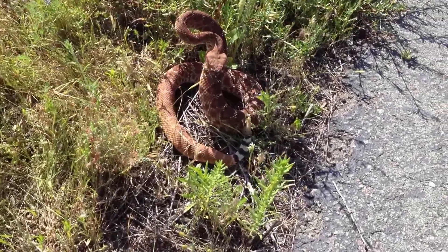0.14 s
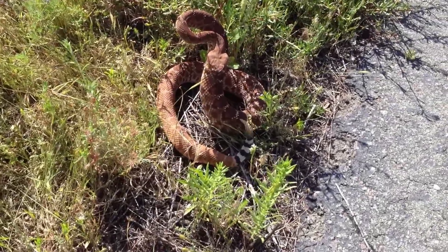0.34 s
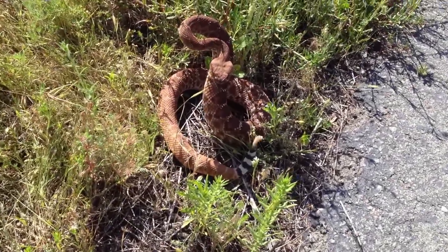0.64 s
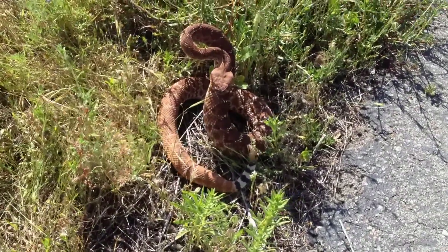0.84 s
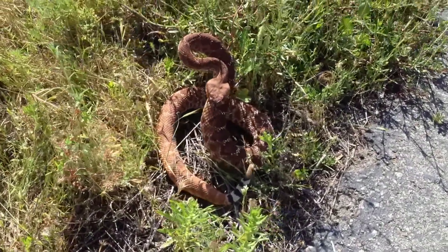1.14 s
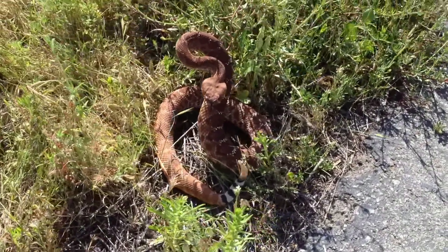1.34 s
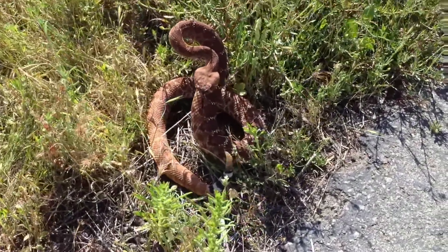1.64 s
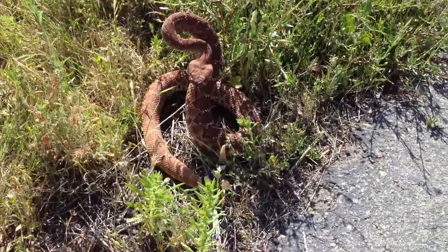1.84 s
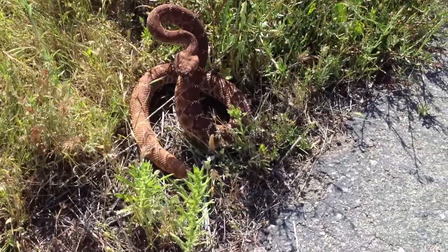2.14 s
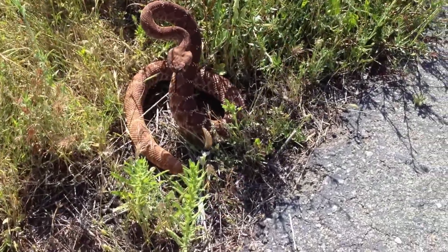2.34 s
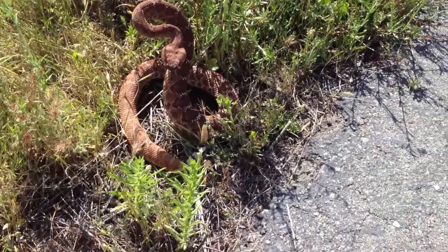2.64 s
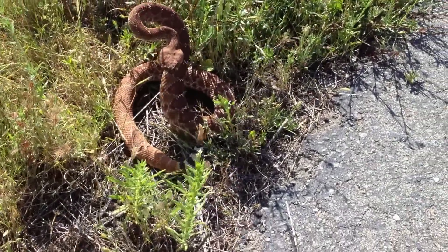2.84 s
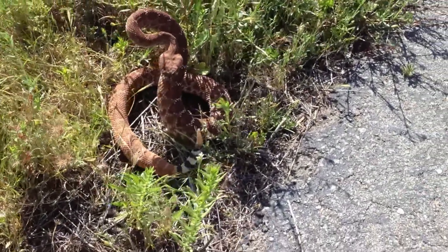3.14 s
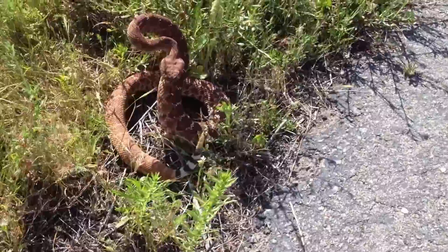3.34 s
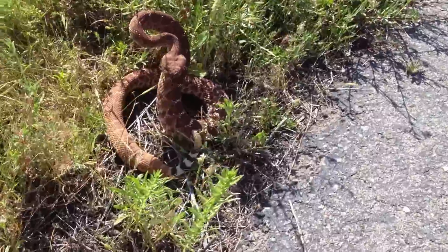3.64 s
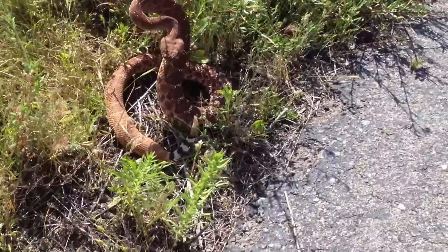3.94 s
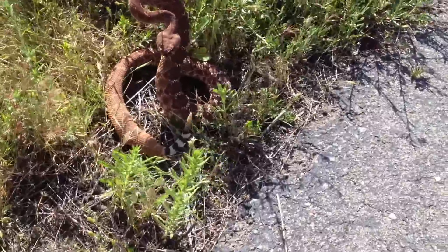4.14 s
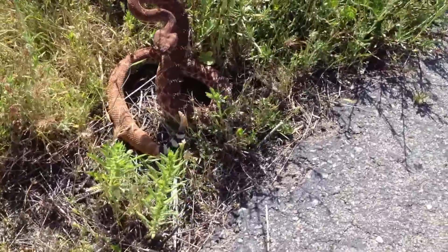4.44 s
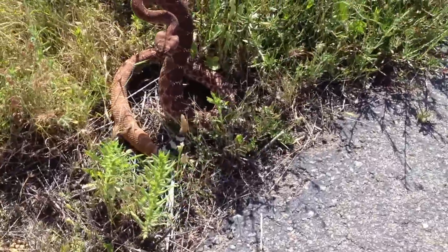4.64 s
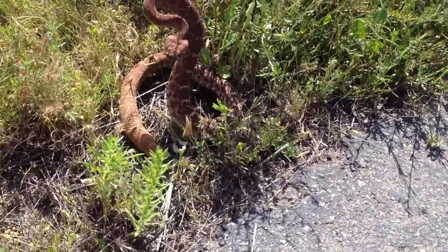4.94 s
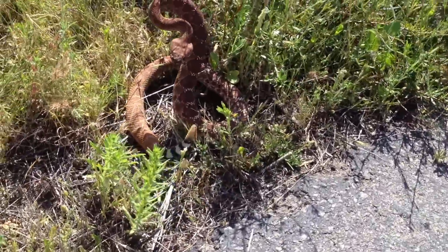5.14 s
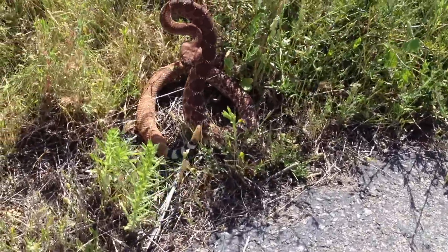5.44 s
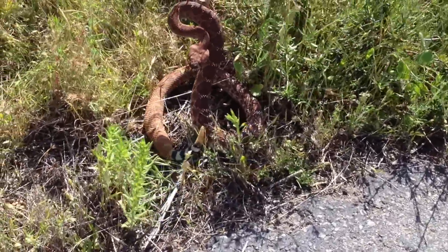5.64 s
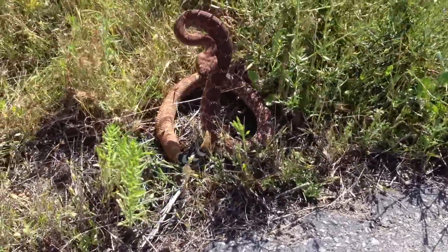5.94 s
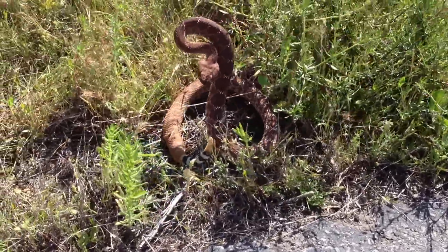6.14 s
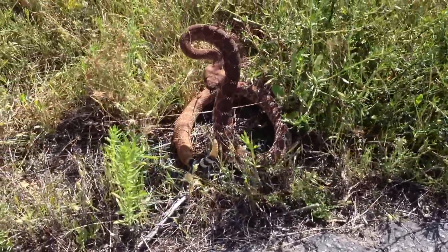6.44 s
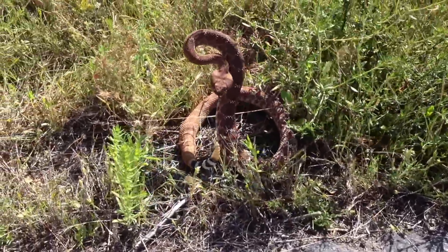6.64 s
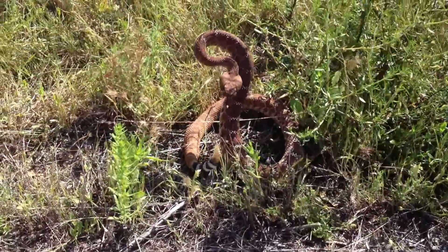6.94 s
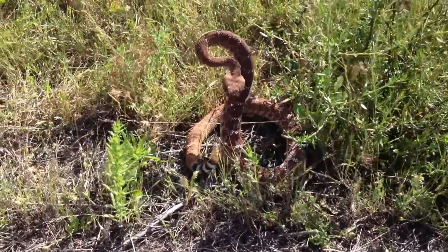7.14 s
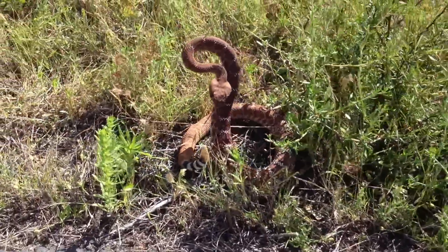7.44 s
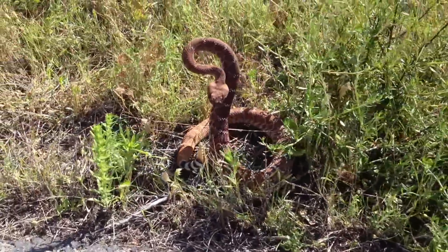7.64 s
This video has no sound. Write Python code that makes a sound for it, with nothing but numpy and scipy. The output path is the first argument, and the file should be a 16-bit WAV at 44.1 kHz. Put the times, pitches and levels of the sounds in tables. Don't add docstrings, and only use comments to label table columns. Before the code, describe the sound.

Outdoors at a grassy roadside, a dry, bright rattle starts as quiet uneven ticks, firms into rapid steady shaking, dips slightly, swells again, and finally fuses into a dense high buzz that slows a little. Low muffled wind puffs bump the close microphone, and occasional sharp snaps and short scrapes come from shifting feet. A thin airy background has a barely audible far whine.

```python
import sys
import numpy as np
from scipy import signal
from scipy.fft import rfft, irfft, next_fast_len
from scipy.io import wavfile
from scipy.ndimage import uniform_filter1d, minimum_filter1d

SR = 44100
rng = np.random.default_rng(int(sys.argv[2]) if len(sys.argv) > 2 else 0)


def master(y):
    cut = np.clip(np.atleast_2d(y).T, -1, 1)
    pcm = np.round(cut * 32767)
    wavfile.write(sys.argv[1], SR, pcm.astype(np.int16))


def how_loud(loudness_db):
    steps = np.asarray(loudness_db, float) / 20
    return 10 ** steps


N = 344421

# t/s, peak level/dB, time to peak/ms, burst length/ms, drop to loose rattle/dB
TWITCHES = [(0.034, -33, 11, 20, -5.5), (0.085, -41, 3.0, 5.3, -24), (0.138, -32.5, 8.2, 13, -6),
            (0.182, -41, 3.0, 4.0, -15), (0.237, -35.5, 20, 21.3, -14), (0.31, -39, 9.9, 15, -6),
            (0.371, -30.5, 8.7, 13.4, -11), (0.425, -32, 4.7, 34, -9), (0.483, -35.5, 6.4, 5.2, -13.5),
            (0.529, -33, 16, 15, -7.5), (0.587, -31.5, 2.6, 26, -10.5), (0.649, -31.5, 7, 8.4, -11.5),
            (0.698, -40, 9.5, 47, -12), (0.768, -34, 9.5, 11, -11), (0.822, -34.5, 13.0, 27, -14),
            (0.862, -47.4, 3.0, 3.4, -4.5), (0.912, -33.5, 4.5, 23, -9.5), (0.965, -31, 9.8, 27, -11),
            (1.019, -31, 14, 23, -11.5), (1.075, -29.5, 5.1, 23.0, -9), (1.118, -30, 9.7, 21, -7),
            (1.166, -28.5, 12, 15, -8), (1.214, -31.4, 7.1, 38, -15), (1.267, -30, 6.8, 25, -11)]
# t/s, peak level/dB, drop to loose rattle/dB
SHAKING = [(1.313, -31.5, -5.5), (1.452, -28, -7), (1.582, -25.5, -5), (1.67, -25.5, -7.5), (1.76, -26, -3),
           (2.063, -25.5, -6), (2.359, -28, -7), (2.447, -28, -16), (2.492, -28, -11.5), (2.623, -31, -9),
           (2.911, -32, -11.5), (3.06, -33, -8), (3.202, -32, -9.5), (3.298, -30.5, -13), (3.513, -29, -8),
           (3.634, -28.5, -5), (3.897, -29.5, -8), (4.063, -28.5, -7.5), (4.153, -30.5, -12.5),
           (4.197, -28, -10), (4.246, -29, -5.5), (4.455, -26.5, -6.5), (4.802, -26.5, -4),
           (5.03, -26.5, -6.5), (5.283, -27, -2), (5.42, -27, -6), (5.503, -25.5, -3), (5.776, -26.5, -2.5),
           (5.945, -26, -0.5)]
# t/s, peak level/dB, time to peak/ms, burst length/ms, drop/dB
FLICK_SPREAD = (0.0015, 0.27, 1.6, 3.3, 1.35)
# t/s, level/dB, throws per second/Hz, throb depth/0-1
BUZZ = [
    (5.96, -57, 210, .2),
    (5.99, -30, 173, 0),
    (6.1, -27.5, 210, 0.06),
    (6.35, -27, 165, 0.4),
    (6.6, -26, 164, 0.58),
    (6.85, -25.5, 168, 0.5),
    (7.3, -26.5, 150, 0.45),
    (7.55, -26, 144, 0.6),
    (7.81, -26.5, 130, 0.45),
]
# f/Hz, density/dB per Hz
FLICK_SHELL = [(1290, -37), (2200, -23), (2660, -16), (3690, -9), (4330, -10), (4730, -2.5), (5120, -5.5),
               (6160, -0.5), (6990, -0.5), (7630, 0), (10700, -4.5), (13700, -3), (14800, -4.5)]
# f/Hz, density/dB per Hz
BUZZ_SHELL = [(1000, -33), (1700, -26.5), (3570, -9.5), (4090, -10.5), (5130, -4.5), (5720, -1), (6380, 0),
              (8140, -1.5), (10100, -4.5), (14800, -4.5)]
# t/s, f/Hz, level/dB
SHELL_RING = [
    (0, 4970, 3.5),
    (1.2, 5070, 4.5),
    (1.6, 7300, 3),
    (2.4, 7700, 2),
    (3.8, 6760, -0.8),
    (4.6, 8100, 4),
    (5.5, 7800, 2),
    (6.2, 8200, 3.5),
    (6.75, 7900, 2),
    (7.81, 7300, 1.5),
]
# f/Hz, width/Hz, level/dB, start t/s
LOW_RING = (6250, 430, 2, 4)
# f/Hz, width/Hz, level/dB
HOLLOW = (7100, 560, -0.72)
# t/s, level/dB
WIND = [(0, -51.5), (.85, -52), (1.4, -49), (1.7, -52.5), (2, -47), (2.35, -52.5), (2.5, -44), (2.9, -45),
        (3.15, -51), (3.4, -41.5), (3.85, -51.5), (4.05, -49.5), (4.4, -55), (5.05, -45), (5.35, -51),
        (5.9, -43.5), (6.4, -49), (6.75, -54)]
# f/Hz, density/dB per Hz
WIND_COLOUR = [(18, -66), (30, -39), (101, -2), (177, 0.5), (259, -9), (292, -11), (426, -17), (550, -21),
               (720, -34.5), (1210, -120)]
# t/s, peak level/dB, f/Hz
BUFFETS = [(1.44, -25.5, 162), (1.45, -24, 163), (1.468, -32.5, 207), (2.472, -34, 153), (2.496, -33, 155),
           (2.574, -31.5, 166), (2.609, -32, 136), (2.689, -34, 175), (2.74, -24, 196), (2.755, -22.5, 200),
           (2.766, -28, 195), (2.8, -30, 258), (2.819, -28, 158), (2.84, -27.5, 187), (2.881, -29.5, 172),
           (3.35, -26.5, 170), (3.433, -34, 170), (3.541, -32.5, 230), (5.057, -31.5, 234),
           (5.138, -25, 188), (5.614, -25, 180), (5.638, -27.5, 184), (5.669, -27, 180), (5.687, -22, 195),
           (5.745, -18.5, 225), (5.758, -28.5, 266), (5.772, -19, 194), (6.2939, -25, 230),
           (6.306, -23, 174), (6.863, -34, 159)]
# t/s, peak level/dB, f/Hz
PUFFS = [(0.487, -41, 148), (2.175, -37.5, 144), (2.673, -32, 167), (2.716, -34, 174), (3.341, -34.5, 183),
         (3.381, -34, 210), (3.583, -37, 312), (4.001, -32.5, 185), (4.062, -36.5, 168),
         (4.531, -36.5, 176), (4.874, -37, 235), (4.996, -33.5, 184), (5.12, -40.5, 252), (5.867, -33, 177),
         (6.156, -35, 235), (6.246, -35.5, 218), (6.387, -35, 194)]
# t/s, peak level/dB, f/Hz, ring/ms
SNAPS = [(0.216, -40, 960, 1.5), (0.257, -38, 1243, 3.3), (0.866, -28, 1110, 1.2), (1.144, -29, 1685, 0.26),
         (1.354, -40, 1120, 1.1), (1.411, -40, 1760, 1.3), (1.804, -38, 998, 1.2), (2.634, -23, 2480, 1.1),
         (2.635, -29.5, 1060, 1.4), (2.66, -35, 2230, 1.6), (4.374, -32, 920, 1.2), (5.317, -38, 1280, 1.1),
         (5.326, -37, 1010, 1.2), (5.376, -40, 1184, 1.5), (5.391, -33, 1190, 2.5),
         (5.396, -37, 1370, 0.98), (5.413, -34, 1500, 0.89), (6.301, -15, 2300, 0.39),
         (6.308, -24, 1560, 0.8), (2.497, -47, 1200, .8), (2.515, -41, 1300, 0.66),
         (2.708, -36.5, 2030, 0.36), (6.311, -30, 820, 2.8), (7.229, -24, 2200, 0.52)]
# t/s, peak level/dB, f/Hz, ring/ms
MORE_SNAPS = [
    (1.549, -37, 745, 0.8),
    (4.381, -30.5, 547, 1),
    (4.857, -33, 1450, 0.28),
    (7.318, -37, 940, 0.98),
]
# t/s, length/s, level/dB, f/Hz
SCRAPES = [(0.193, 0.044, -55, 885), (1.32, 0.15, -51.5, 1470), (2.628, 0.044, -46, 2000),
           (1.787, 0.04, -56, 990), (2.99, 0.445, -60, 1350), (3.817, 0.085, -52, 1600),
           (4.17, 0.26, -56.5, 1410), (4.373, 0.018, -47, 676), (5.295, 0.037, -47.5, 1190),
           (5.342, 0.097, -46.5, 1300), (6.296, 0.019, -36.5, 1150), (7.163, 0.22, -52.5, 1160)]
# f/Hz, density/dB per Hz
AIR_COLOUR = [(230, 0.5), (360, -4.5), (600, -14), (850, -10.5), (1350, -11.5), (2200, -16.5),
              (4000, -13.5), (15000, -25)]
# f/Hz, width/Hz, level/dB
WHINE = (1083, 16, -77)


def rattle():
    knocks, own = clacks(30000, spread_db=1.7, cycles=4.5)
    thrown = coloured(knocks, FLICK_SHELL, own)
    thrown = thrown * throb(135.0, 0.35, jitter=0.339, sharp=0.82) * how_loud(0.2 * wander(366.0))

    buzz_db, throws_per_s, depth = curve(BUZZ)
    buzz_db[:round(BUZZ[0][0] * SR)] = -120
    buzz = coloured(knocks, BUZZ_SHELL, own) * throb(throws_per_s, depth, jitter=0.025, sharp=0.45)

    body_hz, body_share, body_db = 4160, 0.18, 1
    stroke_db = flick_level()
    soft_db = stroke_db + minimum_filter1d(-stroke_db, size=4000)
    body = signal.sosfiltfilt(signal.butter(2, body_hz, fs=SR, output="sos"), thrown)
    thrown = thrown + (how_loud(body_db + body_share * soft_db) - 1) * body

    both = how_loud(stroke_db) * evened(thrown) + how_loud(buzz_db) * evened(buzz)
    both = tinted(both, patchy_db=0.33)

    low_hz, low_width_hz, low_db, from_s = LOW_RING
    late = np.clip((np.arange(N) / SR - from_s) / 0.3, 0, 1)
    for hz, width_hz, db in ((low_hz, low_width_hz, low_db), HOLLOW):
        both = both + (how_loud(late * db) - 1) * resonate(both, hz, width_hz)
    ring_hz, ring_db = curve(SHELL_RING)
    return both + (how_loud(ring_db) - 1) * resonate(both, ring_hz, width_hz=650)


def clacks(per_s, spread_db, cycles, count=32):
    size = how_loud(spread_db * np.minimum(rng.exponential(1, N), 5))
    size *= rng.random(N) < per_s / SR
    size *= rng.choice([-1., 1.], N)
    spot = rng.integers(0, count, N)
    t = np.arange(256) / SR
    hz = np.geomspace(1800, 15500, count)[:, None]
    rings = np.exp(-t * hz / cycles) * np.sin(2 * np.pi * hz * t) * np.sqrt(hz / cycles)
    out = sum(signal.oaconvolve(size * (spot == k), ring)[:N] for k, ring in enumerate(rings))
    mean_spectrum = np.sqrt((abs(rfft(rings, 2048)) ** 2).mean(0)) + 1e-6
    return out, mean_spectrum


def throb(per_s, depth, jitter, sharp):
    turns = np.cumsum(per_s * (1 + jitter * wander(59.4))) / SR
    wave = np.cos(2 * np.pi * turns) + sharp * np.cos(4 * np.pi * turns - 0.8)
    return np.sqrt(np.maximum(1 + depth * wave, 0.05))


def flicks():
    beat_s, peak_ms, burst_ms = 0.045, 10.2, 26.6
    s, db, loose_db = np.transpose(SHAKING)
    beat = np.append(0, np.cumsum(np.round(np.diff(s) / beat_s)))
    every = np.arange(beat[-1] + 1)
    columns = (s, db, peak_ms, burst_ms, loose_db)
    rows = np.array([np.interp(every, beat, c * np.ones(len(s))) for c in columns]).T
    rows = rows + np.array(FLICK_SPREAD) * np.clip(rng.standard_normal(rows.shape), -2, 2)
    return np.vstack([TWITCHES, rows])


def flick_level():
    rise_ms, drop_ms, sag_db_per_ms = 2.2, 2.1, 0.2252
    table = flicks()
    rows = [(0, -70), (table[0, 0], -68)]
    next_s = np.append(table[1:, 0], BUZZ[1][0] + 0.099)
    for (s, db, peak_ms, burst_ms, loose_db), after_s in zip(table, next_s):
        gap_ms = 1000 * (after_s - s)
        at_ms = [rise_ms, peak_ms, min(peak_ms + 1.2, burst_ms), burst_ms, burst_ms + drop_ms, gap_ms]
        at_ms = np.minimum(np.maximum.accumulate(at_ms), gap_ms)
        level_db = db + np.array([-7., 1.6, -0.7, -0.7, loose_db, loose_db])
        level_db = level_db - sag_db_per_ms * np.maximum(at_ms - peak_ms, 0)
        rows += zip(s + at_ms / 1000, level_db)
    rows.append((rows[-1][0] + 0.041, -70))
    return uniform_filter1d(curve(rows)[0], size=130)


def wind():
    lumps = how_loud(2.6 * wander(70.0))
    turbulence = coloured(rng.standard_normal(N), WIND_COLOUR) * lumps
    out = how_loud(curve(WIND)[0] - 2.5) * evened(turbulence)
    for s, db, hz in BUFFETS + PUFFS:
        lead_s, puff = wavelet(hz, 0.72 / hz, 0.85 / hz)
        add(out, s + lead_s, how_loud(db) * puff)
        lead_s, flap = wavelet(1.785 * hz, 0.42 / hz, 0.56 / hz)
        add(out, s + lead_s, how_loud(db - 13.5) * flap)
    return out


def feet():
    out = np.zeros(N)
    for s, db, hz, ring_ms in SNAPS + MORE_SNAPS:
        ring_ms = max(ring_ms, 0.2)
        lead_s, tick = wavelet(hz, 0.49 / hz, ring_ms / 2000)
        add(out, s + lead_s, how_loud(db) * tick)
        lead_s, crack = wavelet(2.58 * hz, 0.4 / hz, ring_ms / 4000)
        add(out, s + lead_s - 0.0005, how_loud(db - 6.0) * crack)

    crackle = how_loud(2.0 * np.minimum(rng.exponential(1, N), 5))
    crackle = crackle * (rng.random(N) < 2500 / SR) * rng.standard_normal(N)
    for s, length_s, db, hz in SCRAPES:
        part = crackle[round(s * SR):round((s + length_s) * SR)]
        part = evened(resonate(resonate(part, hz, 1.3 * hz), hz, 2 * hz))
        add(out, s, how_loud(db) * part * signal.windows.tukey(len(part), 0.5))
    return out


def air():
    hiss_db, rise_db_per_s = -62.5, 1.05
    hiss = tinted(coloured(rng.standard_normal(N), AIR_COLOUR), patchy_db=2.0)
    hiss = hiss * how_loud(hiss_db + rise_db_per_s * np.arange(N) / SR)
    hz, width_hz, db = WHINE
    whine = evened(resonate(rng.standard_normal(N), hz, width_hz))
    return hiss + how_loud(db + 8.2 * np.tanh(wander(1.5))) * whine


def evened(x):
    return x / np.sqrt(np.mean(x ** 2) + 1e-20)


def curve(rows):
    s, *columns = np.transpose(rows)
    return [np.interp(np.arange(N) / SR, s, c) for c in columns]


def coloured(x, points, own=1):
    size = next_fast_len(N + 4096)
    hz = np.fft.rfftfreq(size, 1 / SR) + 1
    f, db = np.transpose(points)
    outside_oct = np.maximum(np.log2(f[0] / hz), 0) + np.maximum(np.log2(hz / f[-1]), 0)
    gain = how_loud(np.interp(np.log(hz), np.log(f), db) - 24 * outside_oct)
    own = np.interp(np.linspace(0, 1, len(hz)), np.linspace(0, 1, np.size(own)), np.ravel(own))
    return evened(irfft(rfft(x, size) * gain / own, size)[:N])


def resonate(x, hz, width_hz):
    turn = np.exp(2j * np.pi * np.cumsum(hz * np.ones(len(x))) / SR)
    r = np.exp(-np.pi * width_hz / SR)
    return 2 * (turn * signal.lfilter([1 - r], [1, -r], x / turn)).real


def tinted(x, patchy_db):
    z = signal.stft(x, nperseg=256)[2]
    patches = uniform_filter1d(rng.standard_normal(z.shape[::-1]), size=4, axis=1)
    patches = uniform_filter1d(patches, size=10, axis=0)
    return signal.istft(z * how_loud(patchy_db * evened(patches).T), nperseg=256)[1][:N]


def wander(hz):
    low = signal.butter(2, hz, fs=SR, output="sos")
    return evened(signal.sosfiltfilt(low, rng.standard_normal(N), padtype="even"))


def wavelet(hz, rise_s, ring_s):
    t = np.arange(-3 * rise_s, 6 * ring_s, 1 / SR)
    shape = np.where(t < 0, np.exp(-(t / rise_s) ** 2), 1 / np.cosh(t / ring_s))
    return t[0], -shape * np.cos(2 * np.pi * hz * t)


def add(mix, s, sound):
    part = mix[max(round(s * SR), 0):][:len(sound)]
    part += sound[:len(part)]


def scene():
    return (rattle() + wind() + feet() + air())[None]


def band_limit(x):
    return signal.sosfilt(signal.butter(12, 16170, fs=SR, output="sos"), x)


def record(dry):
    rumble_cut_hz, edge_hz = 60, 15330
    cut = signal.sosfilt(signal.butter(2, rumble_cut_hz, "high", fs=SR, output="sos"), dry)
    edge = signal.firwin(601, edge_hz, window=("kaiser", 9), fs=SR)
    mix = signal.oaconvolve(cut, edge[None], "same")
    return band_limit(mix)


dry = scene()
out = record(dry)
master(out)
```